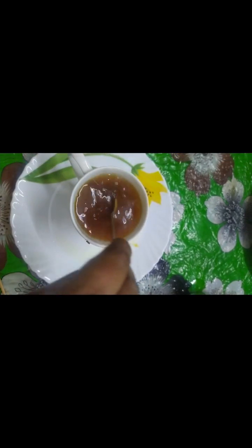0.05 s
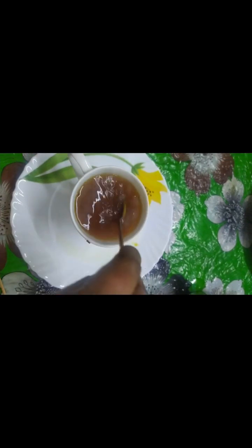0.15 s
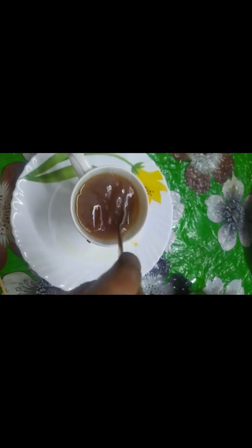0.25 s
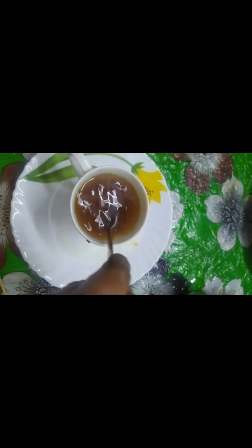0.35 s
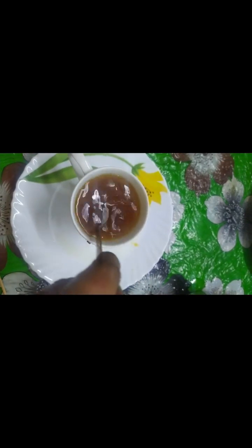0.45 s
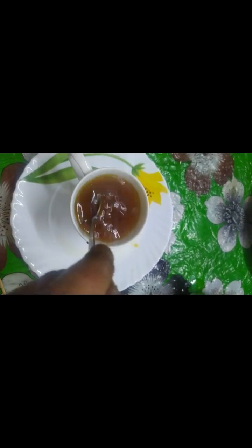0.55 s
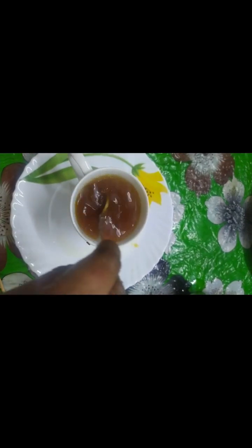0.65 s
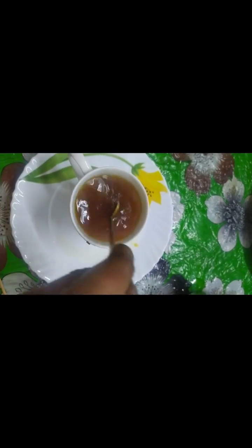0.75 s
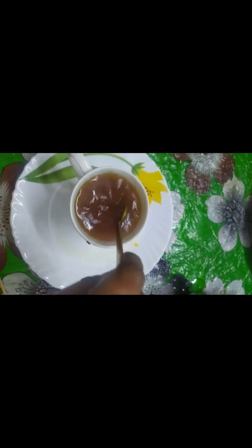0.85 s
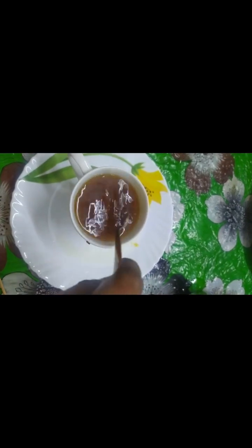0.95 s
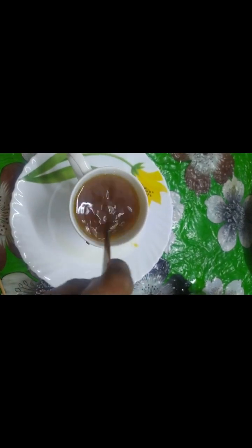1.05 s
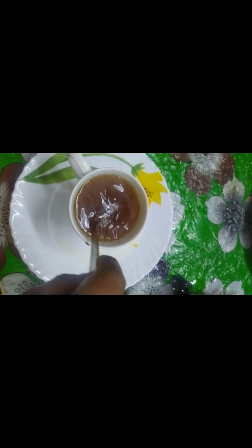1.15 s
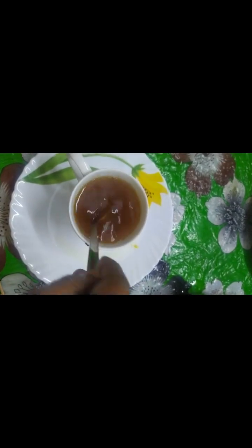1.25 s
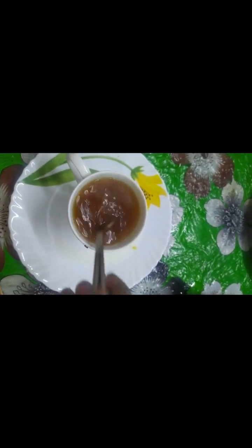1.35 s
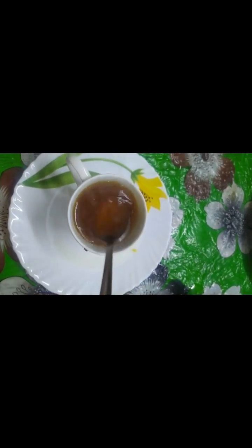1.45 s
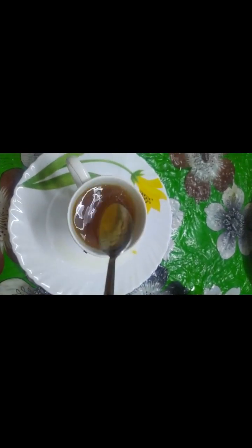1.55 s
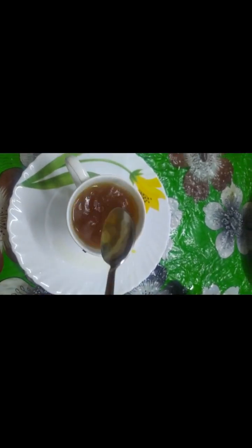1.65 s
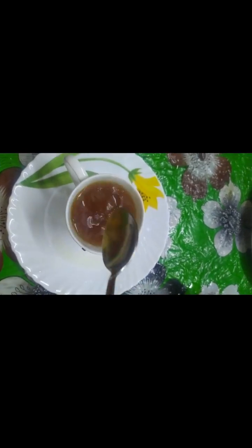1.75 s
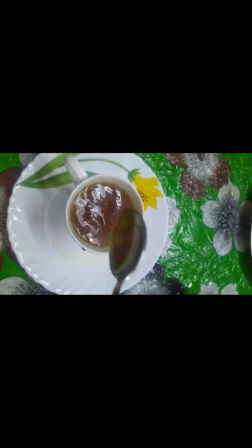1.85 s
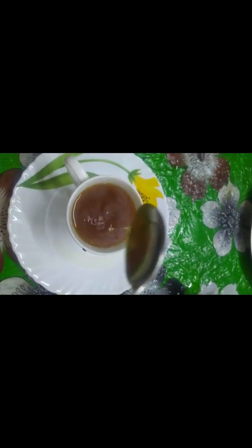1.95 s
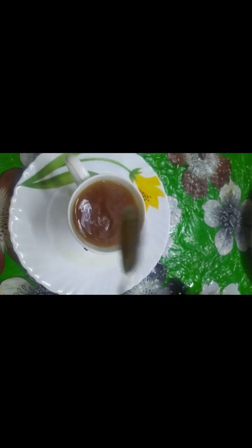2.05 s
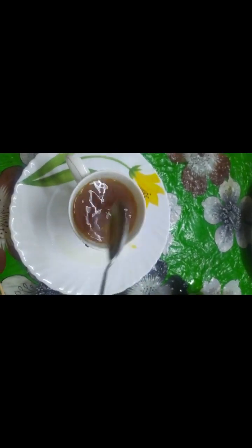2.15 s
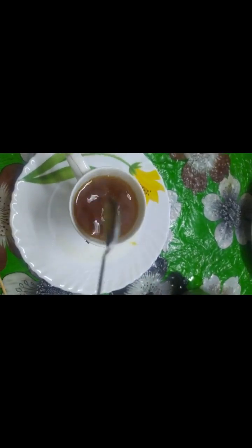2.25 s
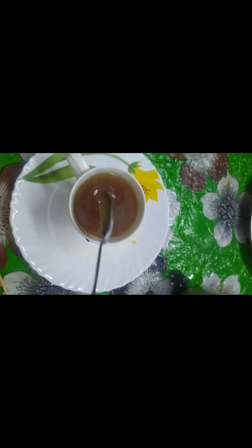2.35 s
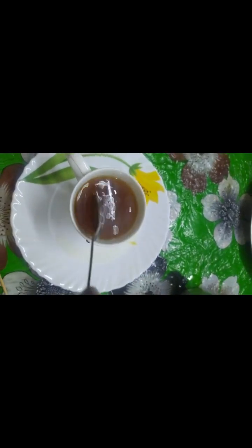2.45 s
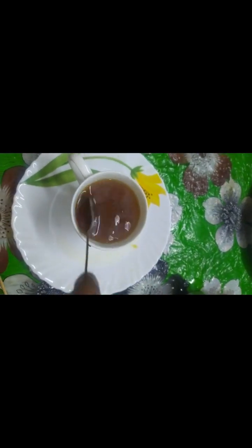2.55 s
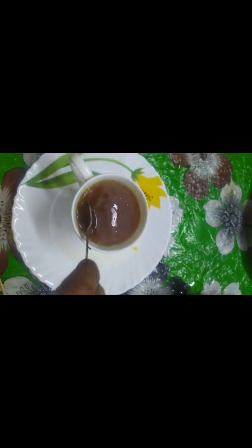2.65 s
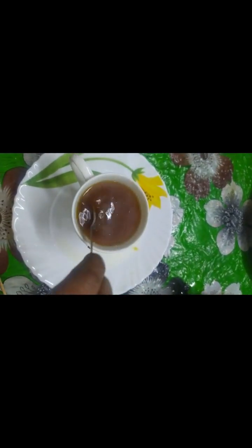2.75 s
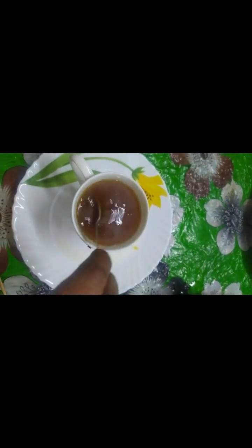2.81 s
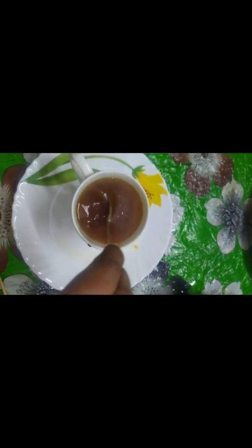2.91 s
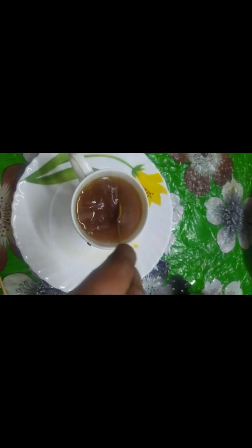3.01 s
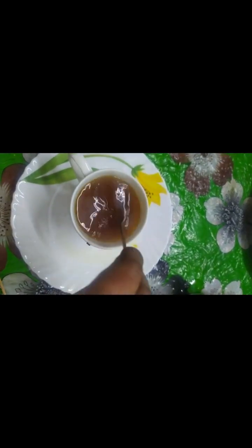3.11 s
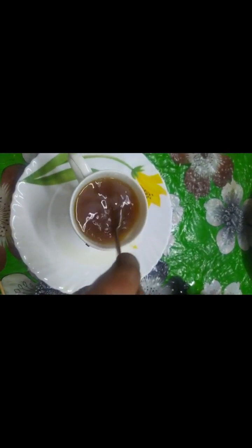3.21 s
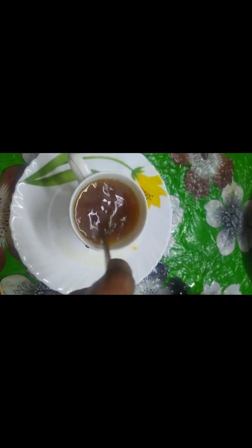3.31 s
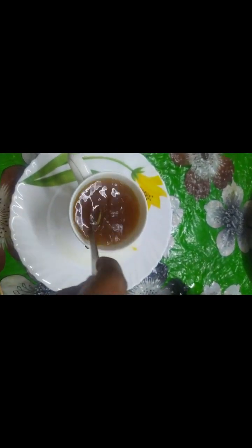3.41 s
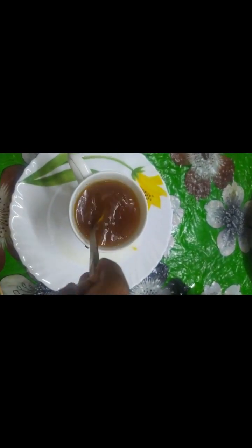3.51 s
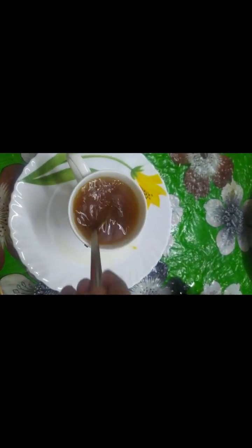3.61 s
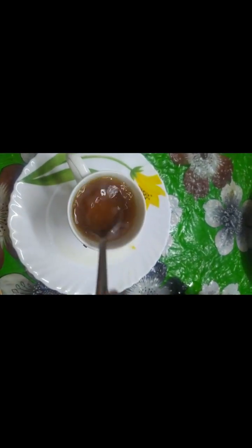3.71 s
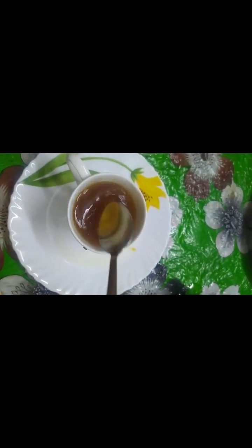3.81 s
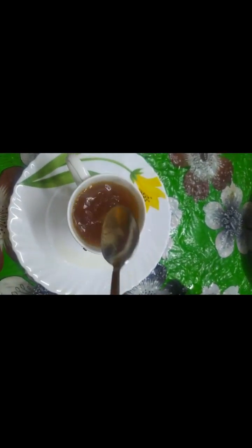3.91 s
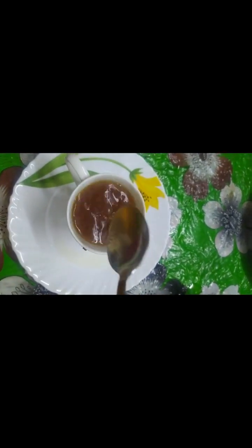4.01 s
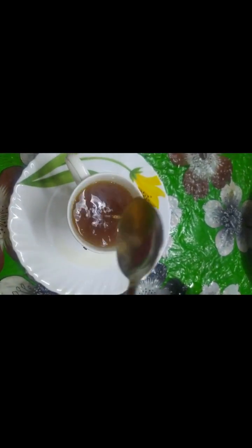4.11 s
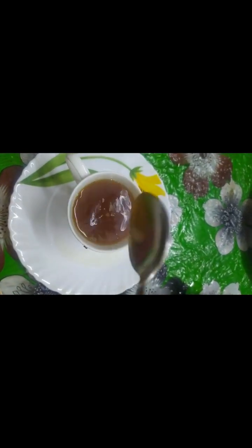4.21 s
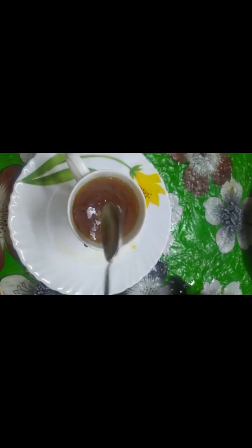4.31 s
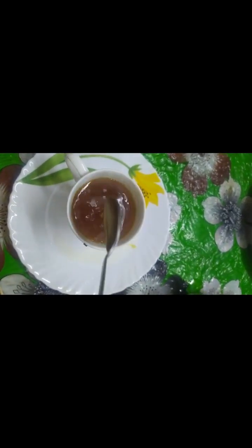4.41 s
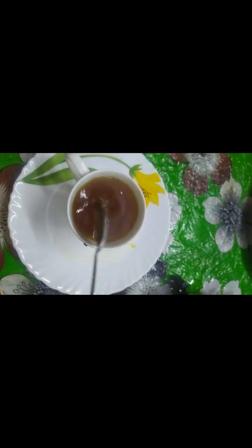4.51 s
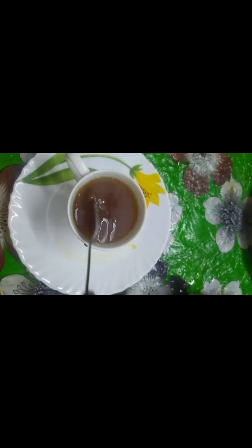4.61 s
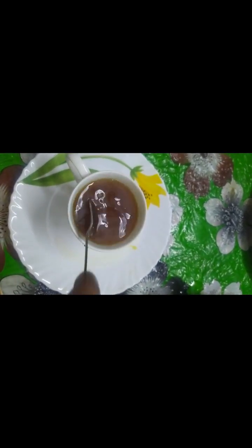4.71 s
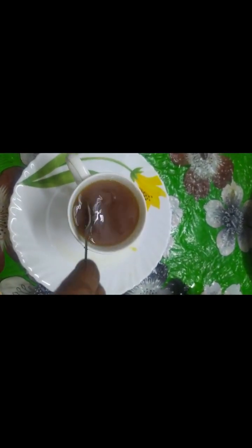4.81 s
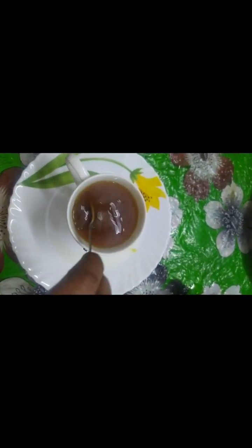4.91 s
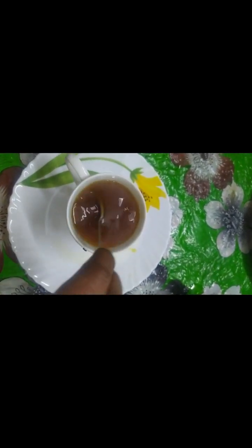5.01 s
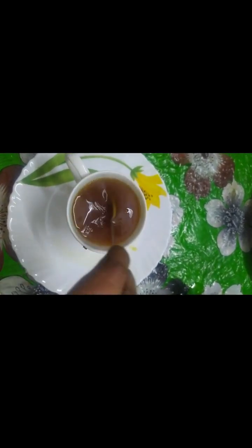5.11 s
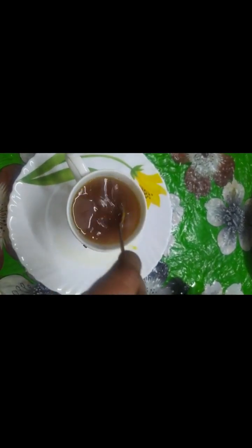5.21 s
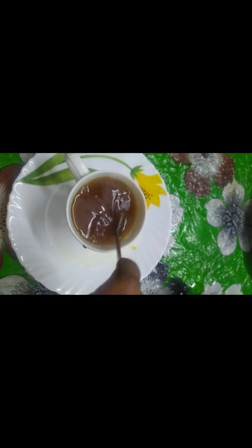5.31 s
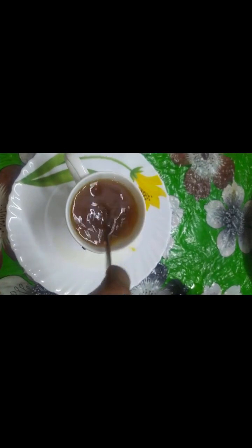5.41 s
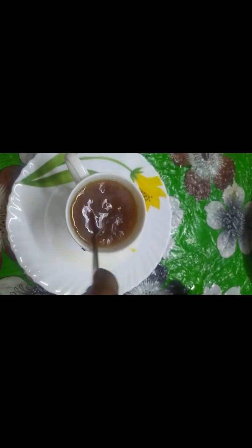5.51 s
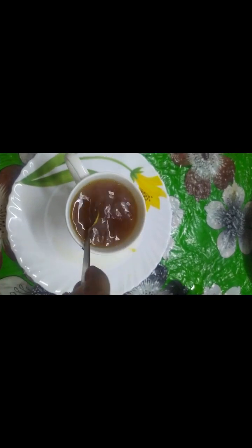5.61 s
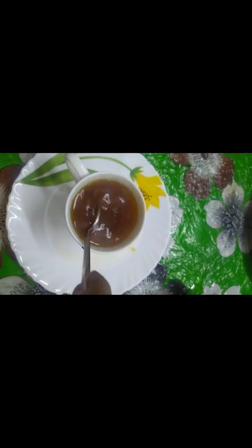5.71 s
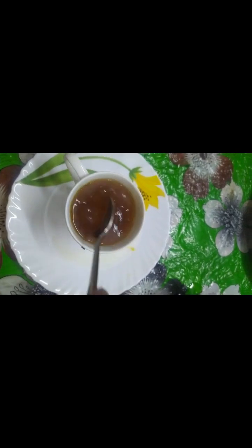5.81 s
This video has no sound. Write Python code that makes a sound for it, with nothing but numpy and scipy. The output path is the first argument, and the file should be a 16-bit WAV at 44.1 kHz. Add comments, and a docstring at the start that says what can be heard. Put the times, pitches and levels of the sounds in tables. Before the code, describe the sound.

Close, bright spoon clinks and short singing scrapes ring in a small filled teacup, broken by two pauses, the second with a single drip.

```python
"""A steel spoon stirs tea in a small ceramic cup on a saucer, in three bouts, close to the microphones.
Each contact is a burst of force that makes the resonances of tick, cup, spoon, saucer and table ring.
Between contacts the spoon slides along the wall as fluttering tones and scraping grains; the tea
sloshes as many short bubble tones and coloured noise, and one drop falls off the spoon.
A hard-walled kitchen answers with echoes, over a low room drone, a wavering hum and faint hiss."""
import sys
import numpy as np
from scipy import signal
from scipy.fft import rfft, irfft, next_fast_len
from scipy.io import wavfile
from scipy.ndimage import map_coordinates

SR = 44100
rng = np.random.default_rng(int(sys.argv[2]) if len(sys.argv) > 2 else 0)


def file_out(sig):
    """Save sig as 16-bit WAV at sys.argv[1]."""
    # one column per channel
    cols = np.atleast_2d(sig).T
    # limit, then scale
    lim = np.clip(cols, -1, 1)
    pcm = np.round(lim * 32767).astype(np.int16)
    wavfile.write(sys.argv[1], SR, pcm)


N = 258426
RING_SIZE = 32768  # samples in one ring or echo response
BEAM_DB = 2.5  # the treble leans to the right: left lowered and right raised by this much
# pitches of the cup's split lowest pair, the spoon's bowl and the cup's high overtone
RIM_LOW_HZ, RIM_HIGH_HZ, SPOON_HZ, OVERTONE_HZ = 1906, 2040, 4590, 8573


def amp(db):
    """Decibels to gain."""
    return 10 ** (np.asarray(db) / 20)


def unit(x):
    """x scaled to an rms of 1."""
    return x / np.sqrt(np.mean(x ** 2) + 1e-20)


def along(points, hz):
    """Read a curve of (Hz, value) points on a logarithmic frequency axis."""
    point_hz, values = np.transpose(points)
    return np.interp(np.log(hz + 1), np.log(point_hz + 1), values)


def wobble(rate, size=N):
    """A smooth random curve with rate knots a second."""
    knots = rng.standard_normal(int(size * rate / SR) + 4)
    return map_coordinates(knots, [np.arange(size) * rate / SR])


def filtered(x, response):
    """x with each frequency multiplied by a response."""
    m = next_fast_len(N + 8192)
    return irfft(rfft(x, m) * response(np.fft.rfftfreq(m, 1 / SR)), m)[..., :N]


def coloured(x, spectrum):
    """x filtered by a spectrum, at an rms of 1."""
    return unit(filtered(x, lambda hz: amp(along(spectrum, hz))))


def add(track, s, sound):
    """Mix a sound into the track at time s."""
    start = max(0, round(s * SR))
    track[..., start:start + sound.shape[-1]] += sound[..., :N - start]


def swell(s, length, db):
    """A bell-shaped gain that peaks at db at time s and is 17.5 dB lower at the ends of its length."""
    return amp(db - 17.5 * (2 * (np.arange(N) / SR - s) / length) ** 2)


def paired(size):
    """Noise at the two microphones, most alike from about 70 to 300 Hz."""
    # Each row: frequency in Hz, left-right likeness (1 = identical).
    likeness = [(30, 0.033), (70, 0.94), (170, 0.94), (300, 0.97), (600, 0.44), (1500, 0.083),
                (8000, 0.018)]
    alike = along(likeness, np.fft.rfftfreq(size, 1 / SR))
    turn = np.arccos(np.clip(alike, -1, 1)) / 2
    noise = rfft(rng.standard_normal((2, size)))
    mid, side = irfft(noise * np.array([np.cos(turn), np.sin(turn)]), size)
    return np.array([mid + side, mid - side])


def kitchen(pan_db, early_db, tail_db, early_t60=0.11):
    """Stereo response: the direct path, close echoes off saucer and table, then the room's tail."""
    # How long the tail rings. Each row: frequency in Hz, time to fall by 60 dB in seconds.
    decay_times = [(200, 0.47), (2000, 0.79), (5000, 0.51), (9000, 0.66), (15000, 0.28)]
    hz, frames, z = signal.stft(paired(RING_SIZE), SR, nperseg=256)
    fading = z * amp(-60 * frames / along(decay_times, hz)[:, None])
    tail = signal.istft(fading, SR, nperseg=256)[1][:, :RING_SIZE]
    t = np.arange(RING_SIZE) / SR
    early = paired(RING_SIZE) * amp(-60 * t / early_t60) * (t > .001)
    paths = amp(early_db) * early / np.linalg.norm(early[0])
    paths += amp(tail_db) * tail / np.linalg.norm(tail[0])
    paths[:, 0] += amp([pan_db / 2, -pan_db / 2])  # pan: left minus right of the direct sound
    return paths


def in_kitchen(x, early_db, tail_db):
    """A sustained sound at both microphones, through paths scaled so that the left one has energy 1."""
    paths = kitchen(0, early_db, tail_db)
    return signal.fftconvolve(x[None], paths / np.linalg.norm(paths[0]), axes=1)[:, :N]


def slips(rate, clump_db):
    """Tiny stick-slip impulses, about rate a second, whose strength comes in clumps."""
    happens = rng.random(N) < rate / SR
    return rng.standard_normal(N) * happens * amp(clump_db * wobble(45))


def bubble(hz, cycles, rise):
    """Trapped air rings as a short damped tone that first climbs in pitch; one tone per row of hz."""
    t = np.arange(SR // 20) / SR
    age = t * hz / cycles
    tone = np.sin(2 * np.pi * hz * t * (1 + rise * np.minimum(age, 2)))
    return tone * np.exp(-age) * (1 - np.exp(-t * hz))


def background():
    """Low room drone and faint hiss as coloured noise, with a hum whose level and phase waver."""
    # The hum's level before it is lowered by 1 dB and wavers. Each row: time in seconds, level in dB.
    hum_levels = [(0.0, -61), (0.03, -73.5), (2.5, -74), (2.76, -59), (4.41, -80), (4.63, -50.5),
                  (4.81, -61.5), (5.73, -54.5), (5.86, -60)]
    # Spectrum of the drone. Each row: frequency in Hz, level in dB per Hz before scaling to rms 1.
    drone_spectrum = [(60, -32), (140, -39.5), (174, 4.5), (195, 1.5), (220, 3.5), (250, -5), (285, -3),
                      (350, -16.5), (600, -12), (1500, -41)]
    # Spectrum of the hiss. Each row: frequency in Hz, level in dB per Hz before scaling to rms 1.
    hiss_spectrum = [(12, -39.5), (20, 7), (44, -15), (96, -8), (138, -19), (177, 0), (248, -12), (285, -2),
                     (499, -19.5), (574, -14.5), (780, -26), (11400, -37.5), (16000, -60.5)]
    # A soft low bump rises briefly out of the background: middle in seconds, length in seconds, level in dB.
    drone_swell = (1.565, 0.18, -57.5)
    t = np.arange(N) / SR
    hum_db = np.interp(t, *np.transpose(hum_levels))
    waver_db, drift = 2.5 * wobble(12), .7 * wobble(22)
    hum = amp(hum_db - 1 + waver_db) * np.sqrt(2) * np.sin(2 * np.pi * 123 * t + drift)
    drone = coloured(paired(next_fast_len(N))[:, :N], drone_spectrum)
    hiss = coloured(paired(next_fast_len(N))[:, :N], hiss_spectrum)
    return hum + (amp(-58.5) + swell(*drone_swell)) * drone + amp(-56.5) * hiss


def churning(count=3000):
    """Tea churns as many bubble tones, with light bumps of the spoon on the cup's bottom and some noise."""
    # Spectrum of the slosh. Each row: frequency in Hz, level in dB per Hz before scaling to rms 1.
    slosh_spectrum = [(150, -4.5), (260, -9), (380, -5.5), (500, -10.5), (700, -8), (790, -1.5), (845, 5.5),
                      (910, -8.5), (1100, -8.5), (1600, -7), (3000, -8), (8000, -53), (12000, -75)]
    gulps = np.zeros(N)
    pitches = 520 * np.exp(.5 * rng.standard_normal((count, 1)))
    tones = bubble(pitches, cycles=1.5, rise=0.049)
    for s, size, tone in zip(rng.uniform(0, N / SR, count), rng.exponential(1, count), tones):
        add(gulps, s, amp(2.9 * min(size, 3)) * tone)
    bumps = unit(slips(rate=70, clump_db=2))
    return coloured(unit(gulps) + 0.6 * bumps + 0.3 * rng.standard_normal(N), slosh_spectrum)


def tea_slaps():
    """The tea slaps against the cup, and a soft plop sounds at 1.68 s: bursts of coloured noise that rise fast
    and die away."""
    # Each row: start in seconds, level at the burst's peak in dB; the row at 1.68 s is the soft plop.
    slap_times = [(0.36, -50), (1.055, -46.5), (1.68, -58.5), (2.811, -48), (3.332, -44.5), (5.676, -45.5)]
    # Spectrum of a slap. Each row: frequency in Hz, level in dB per Hz before scaling to rms 1.
    slap_spectrum = [(120, -18), (250, 2.5), (420, -3), (600, -8.5), (830, -3.5), (1100, -19.5),
                     (2500, -29.5)]
    rise_s = 0.006
    envelope = np.zeros(N)
    for s, db in slap_times:
        age = np.maximum(np.arange(N) / SR - s, 0) / rise_s
        envelope += amp(db) * age * np.exp(1 - age)
    return envelope * coloured(rng.standard_normal(N), slap_spectrum)


def stirring():
    """With each sweep the tea churns, while the spoon's tip grates over the glaze in stick-slip grains."""
    # Sweeps of the spoon. Each row: middle in seconds, length in seconds, slosh in dB, grit in dB.
    sweeps = [(0.013, 0.24, -54.5, -60), (0.403, 0.64, -54.5, -61), (0.724, 0.21, -47.5, -60),
              (1.115, 0.61, -51, -57.5), (2.802, 0.18, -58, -63), (2.983, 0.23, -54.5, -61),
              (3.206, 0.11, -66, -45.5), (3.418, 0.77, -51, -58.5), (4.693, 0.26, -54.5, -77),
              (5.008, 0.26, -50.5, -56), (5.315, 0.58, -51, -54.5), (5.627, 0.51, -57, -73)]
    # Spectrum of the grating. Each row: frequency in Hz, level in dB per Hz before scaling to rms 1.
    grit_spectrum = [(5000, -9), (7200, -16), (8350, -4.5), (8570, -1), (8800, -4), (9900, -3),
                     (11500, -17), (14000, -18.5), (16000, -36)]
    lapping = amp(-75.5)  # the tea's own movement between sweeps
    flow = lapping + sum(swell(s, length, slosh_db) for s, length, slosh_db, _ in sweeps)
    pressure = sum(swell(s, length, grit_db) for s, length, _, grit_db in sweeps)
    tea = flow * churning() + tea_slaps()
    grit = pressure * coloured(slips(rate=1100, clump_db=3), grit_spectrum)
    beam = amp([[-BEAM_DB], [BEAM_DB]])
    return in_kitchen(tea, early_db=-3.5, tail_db=-1) + beam * in_kitchen(grit, early_db=4, tail_db=-2.0)


def resonances(modes, damping=1, scatter_db=3.5):
    """Frequency response of a part; every blow lands elsewhere and weighs the modes anew."""
    f = np.fft.rfftfreq(RING_SIZE, 1 / SR)
    response = 0
    for k, (hz, width, db) in enumerate(modes):
        weight = (-1) ** k * amp(db + scatter_db * rng.standard_normal())
        response = response + weight * 1j * f * width / (hz * hz - f * f + 1j * f * width * damping)
    return response


def chatter(span, bounce, soft_hz=11000, count=6):
    """Spectrum of the force: a blow and random bounces within span seconds, rounded by the contact time."""
    force = np.zeros(RING_SIZE)
    force[0] = 1
    when = rng.uniform(.1, 1, count)
    force[(when * span * SR).astype(int)] += bounce * rng.standard_normal(count) * np.exp(-when)
    return rfft(signal.lfilter(*signal.butter(2, min(soft_hz, SR / 2 - 1), fs=SR), force))


def sounded(response, db):
    """The ringing of a response, with rms level db over its first 20 ms, fading to silence at its end."""
    x = irfft(response) * np.minimum(1, np.linspace(10, 0, RING_SIZE)) ** 2
    return amp(db) * x / np.sqrt(np.mean(x[:, :SR // 50] ** 2))


def sagged(modes, sag_hz):
    """Modes flattened in pitch by the pressing spoon and the swirling tea."""
    return [(hz - sag_hz, width, db) for hz, width, db in modes]


def swirled(ring):
    """The ring wavers in pitch as the tea swirls round the wall."""
    bend = 0.0018 * wobble(18, size=RING_SIZE)  # share of the pitch, 18 knots a second
    place = np.arange(RING_SIZE) + np.cumsum(bend)
    return np.array([map_coordinates(side, [place]) for side in ring])


def tick_colour(tilt_db):
    """Gain per frequency of a tick; the spot that is struck favours its lower or its upper modes."""
    # The tick is weaker near 6900 Hz and 12300 Hz. Each row: frequency in Hz, gain in dB.
    gains = [(5500, 0.5), (6900, -10.5), (7700, -2), (11400, -2), (12300, -6.5), (16000, -2.5)]
    middle_hz, reach_hz = 9200, 1462  # the tilt turns about the middle and levels off this far each way
    hz = np.fft.rfftfreq(RING_SIZE, 1 / SR)
    khz = np.clip(hz - middle_hz, -reach_hz, reach_hz) / 1000
    return amp(along(gains, hz) + tilt_db * khz)


def cup_ring(db, lower_db, wall_db, sag_hz, damping, grip, force):
    """Rim and wall ring; each mode sags in its own measure and the swirling tea bends them all."""
    # The cup's rim. Each row: frequency in Hz, width in Hz.
    rim_modes = [(RIM_LOW_HZ, 8), (RIM_HIGH_HZ, 10), (3861, 8)]
    # The cup's wall. Each row: frequency in Hz, width in Hz, level in dB.
    wall_modes = [(5300, 22, 0)]
    sag_shares = (.38, 1, .15)  # how far each rim mode follows the sag
    third_db = -9 - 20 * np.log10(grip ** (2 / 3))  # a pressing spoon weakens the third mode
    ring = 0
    for (hz, width), share, mode_db in zip(rim_modes, sag_shares, (lower_db, 0, third_db)):
        mode = resonances([(hz - share * sag_hz, width, 0)], damping)
        ring = ring + sounded(mode * force, db + mode_db)
    wall_sag_hz = 119.4 * np.tanh(sag_hz / 32)  # the wall's sag levels off at 119.4 Hz
    wall = resonances(sagged(wall_modes, wall_sag_hz), damping)
    return swirled(ring + sounded(wall * force, db + wall_db))


def contact(db, lower_db, hardness_db, jolt_db, foot_db, stem_db, bowl_db, wall_db, overtone_db,
            sag_hz, damping, tilt_db=0, pan_db=0):
    """One blow rings table, saucer, cup and spoon; a pressing spoon flattens the ring and mutes itself."""
    # Resonances of the parts. Each row: frequency in Hz, width in Hz, level in dB.
    table_modes = [(175.7, 75, -8), (383, 59, -4.5), (621, 270, -6), (804, 110, -1.5)]
    saucer_modes = [(1500, 150, -9.5), (1484, 85, -6), (2010, 89, 4.5), (2530, 45, -7.5), (2344, 24, -3),
                    (2460, 150, 8.5), (2850, 130, -5), (3947, 66, -16.5), (5340, 97, -18.5),
                    (6530, 30, -16.5)]
    foot_modes = [(1380, 230, -8.5), (1660, 200, -8), (2680, 490, -8), (3206, 350, -4.5), (3444, 160, 1),
                  (4114, 570, -10), (6115, 130, -6.5), (7340, 270, -22)]  # the cup's foot
    stem_modes = [(2227, 100, 0)]  # the spoon's stem
    bowl_modes = [(SPOON_HZ, 4.5, 0), (10670, 25, -12), (13540, 60, -26)]  # the spoon's bowl
    overtone_modes = [(6020, 65, -19), (OVERTONE_HZ, 18, 0)]  # the cup's high overtone
    tick_modes = [(8000, 290, -8.5), (8520, 220, -2), (9260, 67, 5.5), (9770, 42, 3), (9810, 560, 6),
                  (9790, 120, 10.5), (11200, 700, -18), (13680, 500, -29)]
    damping = max(damping, .5)
    grip = 1 + abs(sag_hz / 8.4)  # pressure that gives 8.4 Hz of sag doubles the spoon's damping
    blow = chatter(span=0.003, bounce=0.52)
    rattle = chatter(span=.007, bounce=0.58)  # the cup rocks on its saucer
    snap = chatter(span=0.007, bounce=0.63, soft_hz=10470)  # steel on glaze
    # the cup rings in lobes, which reach the two microphones 1.61 radians out of phase
    lobes = np.exp(.5j * 1.61 * np.array([[1], [-1]]))
    room = lobes * rfft(kitchen(pan_db, early_db=-3.5, tail_db=-6.0))
    # saucer and table lie close below the microphones
    knock = rfft(kitchen(-3.5, early_db=6.5, tail_db=-0.5))
    # the treble is beamed to one side
    beam = amp([[-BEAM_DB], [BEAM_DB]]) * rfft(kitchen(-24.5, early_db=5.0, tail_db=1.0))

    out = cup_ring(db, lower_db, wall_db, sag_hz, damping, grip, blow * room)
    thud_db = -44 + 0.76 * (db + jolt_db + 40.5)  # the table grows 0.76 dB for each dB of the saucer
    out += sounded(resonances(table_modes) * rattle * knock, thud_db)
    out += sounded(resonances(saucer_modes, scatter_db=1.0) * rattle * knock, db + jolt_db)
    out += sounded(resonances(foot_modes, scatter_db=2.5) * blow * knock, db + foot_db)
    out += sounded(resonances(stem_modes) * blow * knock, db + stem_db)
    bowl = resonances(sagged(bowl_modes, 0.85 * sag_hz), grip, scatter_db=2.5)
    out += sounded(bowl * blow * room, db + bowl_db)
    overtone = resonances(overtone_modes, damping, scatter_db=6.0)
    out += sounded(overtone * blow * beam, db + overtone_db)
    tick = resonances(tick_modes, scatter_db=4) * tick_colour(tilt_db)
    return out + sounded(tick * snap * beam, db + hardness_db)


def clinks():
    """Full hits and lighter rings between them: where a blow lands decides how each part answers."""
    # Full hits. Each row: start in seconds, strength (the rim's upper mode) in dB; then, in dB against
    # the strength, the rim's lower mode, hardness of the tick, jolt of the saucer, cup's foot, spoon's
    # stem, spoon's bowl, wall and overtone; then the rim's sag in Hz, damping (1 = rings freely, held
    # to at least 0.5), tilt of the tick in dB per kHz, left minus right of the direct ring in dB.
    hits = [(0.252, -33, -3, 7.5, -10, -7, -25, -7.5, -1, -11, 88, 1.57, -1.5, -1.5),
            (0.381, -44.5, -5, -14, -7.5, -13, -15, -11.5, -0.5, -23, 25, 1.7, -1, 4),
            (0.624, -41.5, -10, 1.5, -1, 1, -23, -8, 0.5, -12, 38, 1.06, -5, 11),
            (0.781, -38, -5, -5.5, -8, -6, -18, -14, -3.5, -28, 32.4, 0.85, -1, 6),
            (0.9804, -30.5, -35, -2, -14.5, -25, -32, -9, 2, -26, 52.5, 1.5, -3, 3),
            (1.051, -38.5, -8.5, -5.5, -4.5, -4, -33, -24, -19, -9, 23, 0.79, -7, 0),
            (1.2134, -41.5, -5.5, -7, -0.5, -10.5, -7, -10, 1.5, -29, 32, 0.56, 1, 2),
            (1.2325, -49.5, -3, -2.5, -8, -17, -14, 4, 4, -28, 33, 1, -6, 3),
            (2.633, -37.5, 3, 8, -11.5, -12, -37, -11, -7.5, -2.5, 22.7, 0.57, -1.5, 1),
            (3.1536, -39.5, 1.5, 18, -6.5, -2.5, -4, 4, -7, 4.5, 71, 1.2, -0.5, -2),
            (3.488, -40, -5.5, -2.5, 5.5, 8.5, -8.5, -17, 6.5, -7.5, 46.5, 0.64, -1.5, 2),
            (4.5968, -21.5, -15, -5.5, -8, -5.5, -8.5, -4, -12.5, -38, 4.4, 1.3, 5, -0.5),
            (4.682, -35.5, -0.5, 3, -5.5, -2.5, -1.5, 5.5, -5, -17, 3.9, 0.47, 1, -1),
            (4.8352, -45.5, 2.5, 4, -8, -11, -22, -11, 5, -21, 11, 0.68, -2, 6),
            (4.9276, -38.5, -3, -12, 7.5, 7, 1, -9, -8.5, -1, 7.3, 2.4, 6, 1),
            (5.2672, -38, 4.5, 17, -5, -3.5, -19, 3.5, -16, 3.5, 67, 1.27, -0.5, -6),
            (5.365, -48, -11, 3.5, 7, 1, -5, -1, -11, -5, 41, 3.1, 3, 3),
            (5.599, -54, -8, 6, 5.5, -1, 17, 10.5, -4, -12, 9.7, 1.3, -3, -4),
            (5.6756, -48.5, 3, 7.5, 4, 2.5, -2, -1, -0.5, 12, 36, 0.7, 6, -1)]
    # Light taps, and at 0.487 s the ring at the height of a slide. Each row: start in seconds,
    # strength in dB, hardness and jolt in dB against the strength.
    light_rings = [(0.016, -50, -14, -6.5), (0.12, -60, -1, -2), (0.2553, -43, 9.5, -21),
                   (0.461, -51.5, -7.5, -2.5), (0.487, -46.5, -16, -8), (0.662, -43, -13.5, -6),
                   (0.729, -44.5, -13, -2.5), (1.168, -44, -8.5, -5), (2.812, -59, -17, 2.5),
                   (2.899, -64, 4, 0), (2.947, -56, 0.5, -4), (2.978, -65, 7, 3), (3.228, -46, -12.5, -2),
                   (3.332, -51.5, -17, -11), (3.39, -46.5, -1.5, -24), (5.069, -56.5, 4.5, -3),
                   (5.2377, -60, 12.5, 5), (5.546, -45.5, -11.5, -13)]
    out = np.zeros((2, N))
    for s, *blow in hits:
        add(out, s, contact(*blow))
    for s, db, hardness_db, jolt_db in light_rings:
        ring = contact(db, lower_db=-11, hardness_db=hardness_db, jolt_db=jolt_db, foot_db=jolt_db - 10.5,
                       stem_db=-25.5, bowl_db=-19, wall_db=-14.5, overtone_db=-23.5, sag_hz=22, damping=1.5)
        add(out, s, ring)
    return out


def singing(hz, width_hz, flutter):
    """A resonance kept going by friction: a tone of rms 1 whose strength and phase flutter."""
    friction = 1 + flutter * (wobble(width_hz) + 1j * wobble(width_hz))
    return unit(np.real(friction * np.exp(2j * np.pi * np.cumsum(hz * np.ones(N)) / SR)))


def slides():
    """Friction keeps the cup singing; the rim's pitch climbs as the spoon travels round the wall."""
    # Each row: start in seconds, length in seconds, rim in dB, scraping in dB (both levels are those
    # that the growing pressure heads for at the slide's end, before the release fade).
    slide_rows = [(0.299, 0.27, -45, -61.5), (1.018, 0.24, -43, -47), (3.191, 0.27, -41.5, -53),
                  (5.3, 0.25, -46.5, -53)]
    # Spectrum of the scraping. Each row: frequency in Hz, level in dB per Hz before scaling to rms 1.
    rub_spectrum = [(800, -35), (1400, -18.5), (2300, 2.5), (2550, 9), (2900, -17.5), (3500, -9.5),
                    (4200, 1), (4550, 6), (4850, -29.5), (7000, -46.5), (14000, -58.5)]
    from_hz, to_hz, climb_s = 1950, 2070, .035  # the rim's climb over one slide
    climb_at = 0.89  # share of the slide at which the pitch climbs fastest
    fade_s, grows_db = 0.043, 14  # attack and release; growth as the spoon presses harder
    t, song, rub = np.arange(N) / SR, np.zeros(N), np.zeros(N)
    grains = coloured(slips(rate=420, clump_db=4), rub_spectrum)
    scrape = grains + amp(-1.5) * singing(5240, width_hz=110, flutter=1.5)  # the wall sings along
    for s, length, rim_db, scrape_db in slide_rows:
        touching = np.clip(np.minimum(t - s, s + length - t) / fade_s, 0, 1)
        climb = .5 + .5 * np.tanh((t - s - climb_at * length) / climb_s)
        rim = singing(from_hz + (to_hz - from_hz) * climb, width_hz=70, flutter=.35)
        pressing = touching * amp(np.interp(t, [s, s + length], [-grows_db, 0]))
        song += pressing * amp(rim_db) * rim
        rub += pressing * amp(scrape_db) * scrape
    return in_kitchen(song, early_db=-11, tail_db=-6) + in_kitchen(rub, early_db=-11, tail_db=-3)


def drip():
    """A drop from the lifted spoon splashes as a noise burst and traps a ringing bubble."""
    # Each row: start in seconds, level in dB before 2 dB are added, starting pitch in Hz.
    drops = [(4.296, -33, 2377)]
    out = np.zeros((2, N))
    for s, db, hz in drops:
        tone = bubble(hz, cycles=8.5, rise=0.007)
        fade = amp(-60 * np.arange(len(tone)) / SR / 0.0052)  # down 60 dB in 5.2 ms
        splash = 0.09 * rng.standard_normal(len(tone)) * fade
        paths = kitchen(0, early_db=-6.0, tail_db=-12.0)
        add(out, s, amp(db + 2.0) * signal.fftconvolve([tone + splash], paths, axes=1))
    return out


def scene():
    """The room, the stirred tea, the spoon's clinks and slides, and the drop, mixed together."""
    return background() + stirring() + clinks() + slides() + drip()


def record(dry):
    """A very steep filter that halves the level at 16300 Hz and removes what lies well above."""
    return filtered(dry, lambda hz: 1 / (1 + (hz / 16300) ** 120))


dry = scene()
out = record(dry)
file_out(out)
```